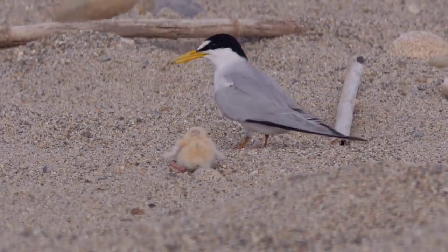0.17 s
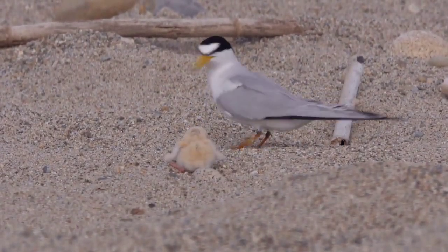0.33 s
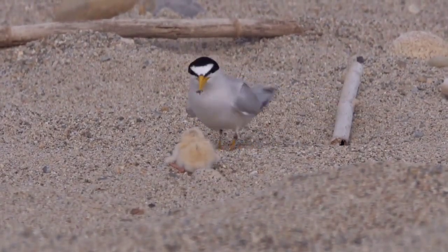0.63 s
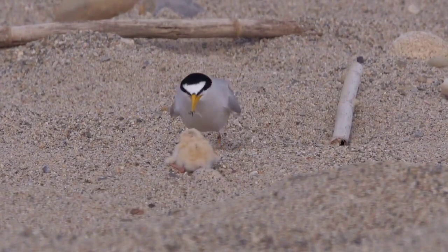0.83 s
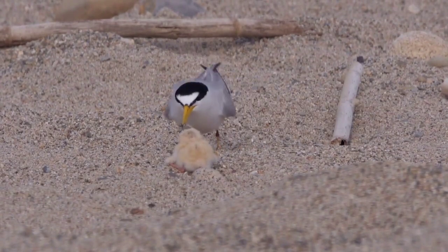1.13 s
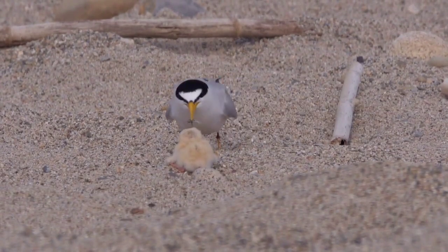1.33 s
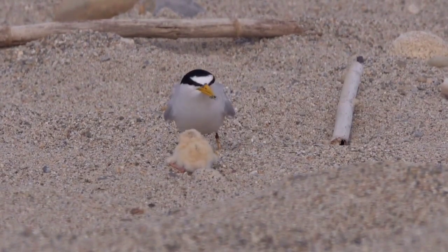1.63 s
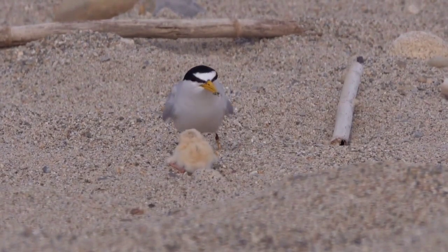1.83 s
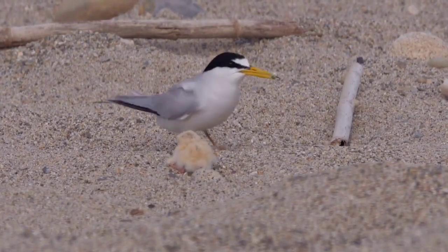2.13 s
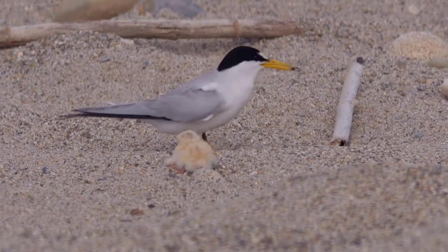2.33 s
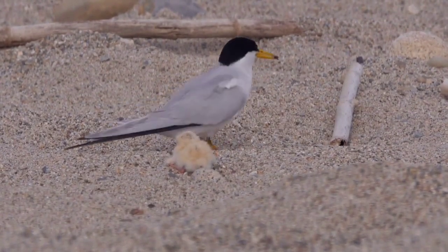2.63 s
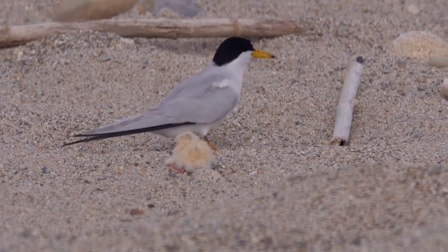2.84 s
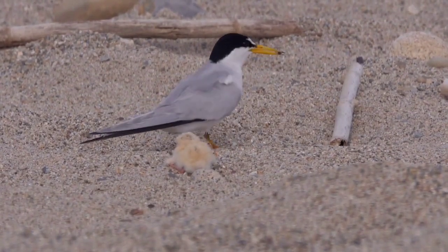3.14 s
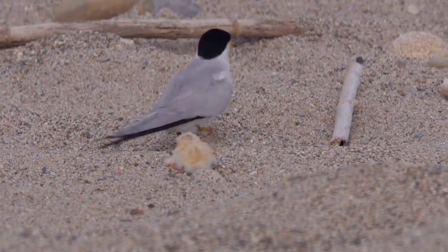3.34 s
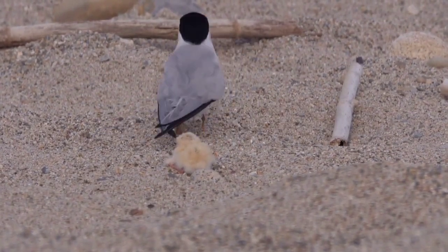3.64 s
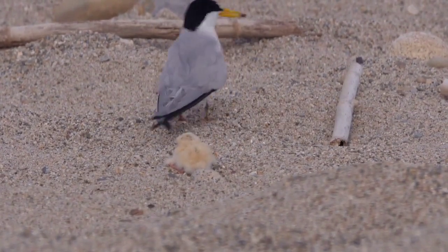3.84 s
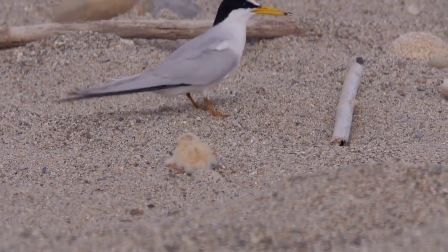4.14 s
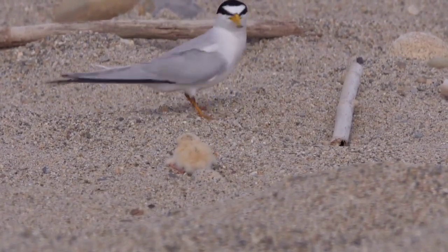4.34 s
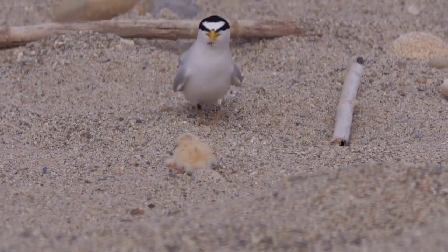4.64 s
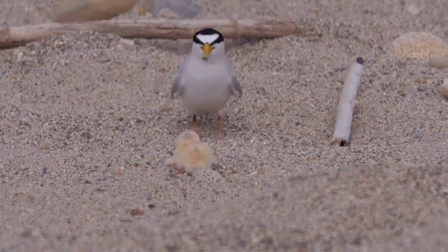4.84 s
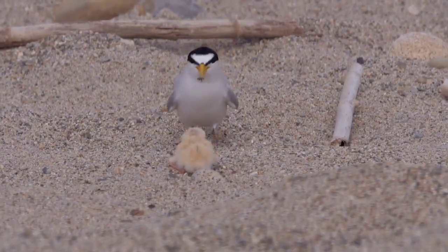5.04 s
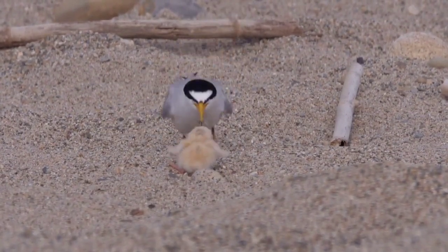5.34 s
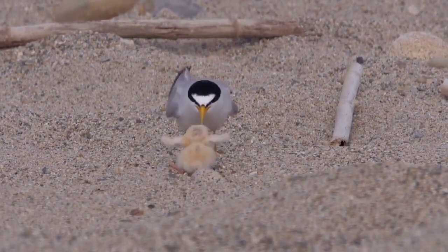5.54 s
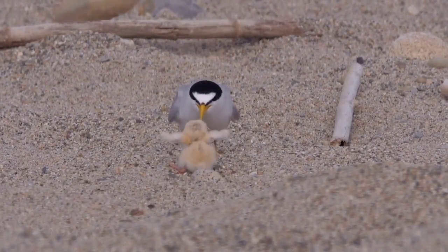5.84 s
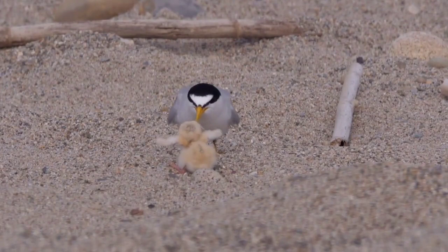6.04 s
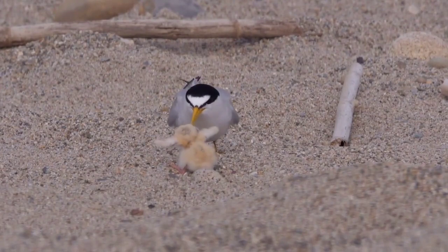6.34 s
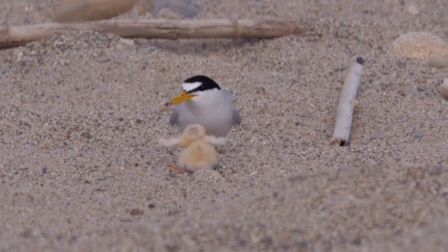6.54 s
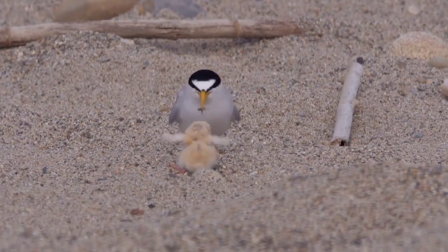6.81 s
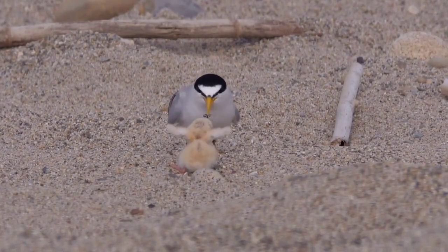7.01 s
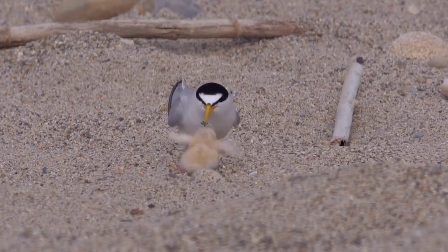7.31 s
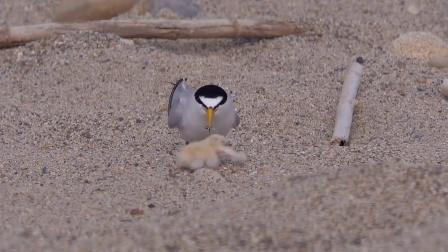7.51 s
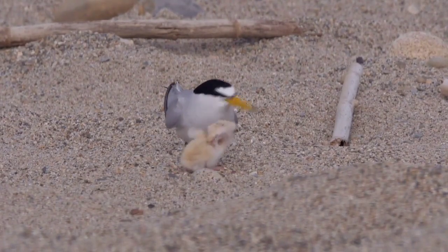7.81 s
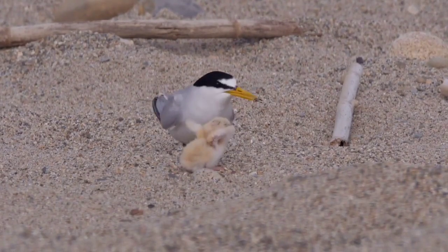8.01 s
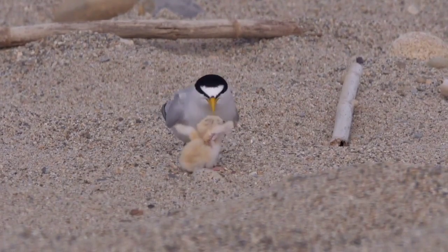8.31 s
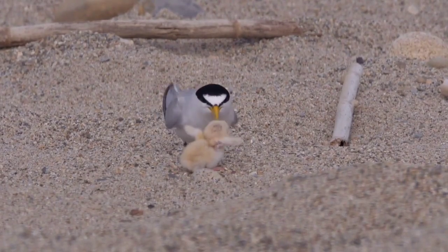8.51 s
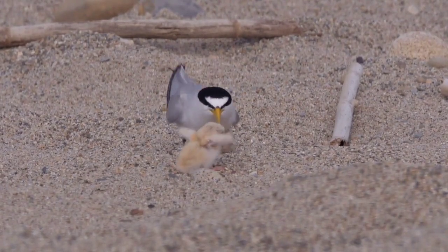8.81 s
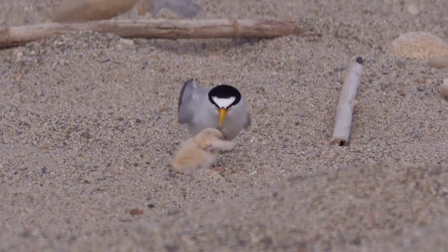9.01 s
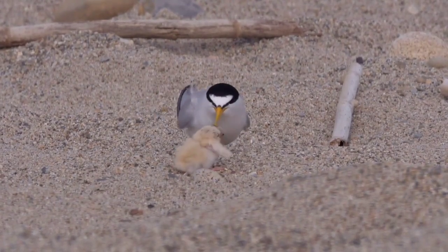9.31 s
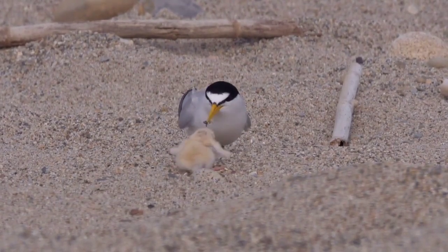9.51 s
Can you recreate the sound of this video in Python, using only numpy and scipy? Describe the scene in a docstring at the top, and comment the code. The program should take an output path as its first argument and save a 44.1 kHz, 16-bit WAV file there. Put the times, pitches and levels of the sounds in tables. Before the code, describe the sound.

Quick high kips and raspy squeaking calls from a small seabird, growing louder and closer, with thin far peeps above even hissing surf.

```python
"""Small terns over a sandy beach

Small terns give short arched kips, rasps that break up into whistles, and thin far peeps.
Each voice is a stack of partials plus rushing air, shaped by a throat; short noise bursts make ticks.
Distant surf is shaped noise that hisses almost evenly; scattered echoes follow the birds and ticks.
A camera with two close microphone ports widens the stereo image, cuts the bass
and turns its gain down after loud calls."""
import sys
import numpy as np
from scipy import signal
from scipy.io import wavfile
from scipy.ndimage import uniform_filter1d

SR = 44100
rng = np.random.default_rng(int(sys.argv[2]) if len(sys.argv) > 2 else 0)


def put_to_file(sound):
    """Save the sound as 16-bit audio at rate SR, in the file named by the first command-line argument."""
    columns = np.atleast_2d(sound).T  # one column per channel
    safe = np.clip(columns, -1, 1)
    whole_steps = np.round(safe * 32767)
    wavfile.write(sys.argv[1], SR, whole_steps.astype(np.int16))


N = 426006
EDGE_HZ = 15750  # top of the camera's band


def amp(db):
    """Turns dB into a gain."""
    return 10 ** (np.asarray(db) / 20)


def evened(x):
    """Scales a signal to rms 1."""
    return x / np.sqrt(np.mean(abs(x) ** 2) + 1e-20)


def read(points, hz):
    """Reads a spectrum table, joining its points by straight lines over log frequency."""
    f, value = np.transpose(points)
    return np.interp(np.log(hz + 1), np.log(f + 1), value)


def add(mix, s, sound):
    """Mixes a stereo sound in at s seconds."""
    part = mix[:, round(s * SR):][:, :sound.shape[1]]
    part += sound[:, :part.shape[1]]


def wander(length, size):
    """Smooth random complex signal of rms 1; a larger size (samples) wanders more slowly."""
    a, b = uniform_filter1d(uniform_filter1d(rng.standard_normal((2, length)), size), size)
    return evened(a + 1j * b)


def surf():
    """Surf and microphone hiss: random short-time spectra with drifting patches and a slow swell."""
    # Relative hiss spectrum: frequency_hz, level_db (per Hz)
    hiss_shape = [(300, -5), (530, -20.5), (700, -30.5), (850, -5.5), (1150, 2.5), (1700, -0.5),
                  (2500, -1.5), (4000, -7), (6000, -13.5), (9300, -15.5), (9900, -18.5), (13000, -17.5),
                  (16000, -18.5)]
    # How alike the two ports' hiss is: frequency_hz, likeness (-1 to 1)
    likeness = [(500, 0.94), (1400, -0.51), (3000, -0.56), (4800, -0.22), (6200, 0.089), (10300, -0.0069),
                (15000, 0.21)]
    # Hiss balance between the ports: frequency_hz, left_over_right_db
    balance = [(60, 3.5), (240, -10), (950, 2), (3770, 2.5), (15000, -1.5)]
    hiss_db = -35  # rms of both ports together
    hop = 128  # samples between spectra
    frames, hz = N // hop + 5, np.fft.rfftfreq(512, 1 / SR)
    a, b, c, d, patches = rng.standard_normal((frames, 257, 5)).T
    patches = uniform_filter1d(patches, size=6, axis=0)
    patches = evened(uniform_filter1d(patches, size=24, axis=1))

    t = np.arange(frames) * hop / SR
    swell = 0
    for f in np.geomspace(.2, 4, num=20):
        swell = swell + np.sin(2 * np.pi * (f * t + rng.random())) / np.sqrt(f)
    swell_db = 0.69 * evened(swell) / (1 + hz[:, None] / 5000)  # fades toward the treble

    same = np.clip(read(likeness, hz), -1, 1)[:, None]
    left, other = a + 1j * b, c + 1j * d
    spectra = np.array([left, same * left + np.sqrt(1 - same ** 2) * other])
    spectra *= amp(read(hiss_shape, hz)[:, None] + 1.6 * patches + swell_db)
    spectra *= amp(np.multiply.outer([.5, -.5], read(balance, hz)))[:, :, None]
    noise = signal.istft(spectra, nperseg=512, noverlap=512 - hop)[1][:, :N]
    return amp(hiss_db) * evened(noise)


def sand(x):
    """Scattered echoes from ground and driftwood, falling 60 dB in 50 ms."""
    t = np.arange(3000) / SR
    scattered = rng.standard_normal((2, 3000)) * (rng.random((2, 3000)) < .1)
    taps = scattered * amp(-60 * t / .05) * (t > .001)
    return signal.oaconvolve(x, taps / np.linalg.norm(taps[0]), axes=1)[:, :N]


def tick(s, db, pan_db):
    """A brief burst of noise that dies away, with its treble softened."""
    burst = rng.standard_normal(300) * np.exp(-np.arange(300) / (.0015 * SR))
    return s, amp(db) * amp([[pan_db / 2], [-pan_db / 2]]) * uniform_filter1d(burst, size=4)


def ports(hz, pan_db, phase):
    """Left and right port gains: mid plus and minus a boosted side, whose delay part grows with pitch."""
    ratio = amp(-pan_db) * np.exp(-1j * np.clip(phase, -3.05, 3.05))  # right over left at 4 kHz
    side = (1 - ratio) / (1 + ratio)
    here = side.real + 1j * side.imag * hz / 4000
    return np.array([1 + here, 1 - here]) / np.sqrt(1 + abs(side) ** 2)


def syrinx(hz, db, shape, throat, place, odd_db=0, rough=.15, air_db=-30):
    """A bird's voice: partials through the throat, smeared by turbulence, plus a broad rush of air."""
    # Far birds: ground bounce thins low partials, air dulls the treble: frequency_hz, gain_db
    far_tone = [(1500, -6), (3000, -5), (4200, -1), (6000, 2), (7500, -12), (12000, -20)]
    hz = hz * (1 + 0.011 * wander(len(hz), size=60).real)
    far = np.clip((-14 - np.max(db)) / 12, 0, 1)  # fainter birds are farther away
    turns, tone, power = np.cumsum(hz) / SR, 0, 0
    for k in range(1, 13):
        partial_hz = k * hz
        gain_db = read(throat, partial_hz) + far * read(far_tone, partial_hz) + odd_db * (k % 2)
        gain = amp(gain_db) * (partial_hz < EDGE_HZ)
        smear = 1 + rough * (1 + .5 * far) * np.sqrt(k) * wander(len(hz), size=16)
        wave = np.exp(1j * (2 * np.pi * k * turns + 2.0 * rng.standard_normal()))
        tone = tone - ports(partial_hz, *place) * gain * smear * wave
        power = power + gain ** 2 / 2
    air_band = signal.butter(1, [1300, 7000], "band", fs=SR)
    rush = signal.lfilter(*air_band, wander(len(hz), size=1))
    air = amp(air_db) * ports(4000, *place)[:, None] * rush
    return (tone / np.sqrt(power.mean()) + air).real * amp(db) * shape


def whistle(s, length, from_hz, to_hz, from_db, to_db, pan_db, phase, droops=True):
    """A nearly clean, slightly arched glide that can droop as it stops; low notes are husky."""
    # Throat and beak for whistles: frequency_hz, gain_db
    whistle_throat = [(1000, 0), (1700, -6.5), (2900, 1.5), (3800, 9), (5800, -7.5), (7500, -16),
                      (9000, -28), (15000, -68)]
    u = np.linspace(0, 1, round(length * SR))
    arch = 0.0188 * np.sin(np.pi * u)
    droop = droops * 0.13 * np.exp((u - 1) * length / 0.0031)
    hz = (from_hz + (to_hz - from_hz) * u) * (1 + arch - droop)
    edge = np.clip(np.minimum(u, 1 - u) * length / .002, 0, 1)  # 2 ms fades
    shape = edge * amp(1.2 * wander(len(u), size=200).real)
    husky = to_hz < 2000
    level_db = from_db + (to_db - from_db) * u
    return s, syrinx(hz, level_db, shape, whistle_throat, (pan_db, phase),
                     rough=0.13 + 0.19 * husky, air_db=-28 + 11.8 * husky)


def peep(s, length, from_hz, to_hz, db, pan_db):
    """One faint whistle from a distant bird, losing 2 dB along the way."""
    return whistle(s, length, from_hz, to_hz, db, db - 2, pan_db, phase=-2.86)


def rasp(s, length, from_hz, to_hz, from_db, to_db, pan_db, phase, rate):
    """A slow flutter chops the tone into pulses, which widen and merge into a pitch wobble with effort."""
    # Throat and beak for rasps: frequency_hz, gain_db
    rasp_throat = [(1000, 26), (1700, -5.5), (2900, 7), (3800, 3), (5300, -11.5), (7500, -18.5),
                   (9000, -34), (15000, -104)]
    bend = 1.8  # power of time by which the pitch climbs
    u = np.linspace(0, 1, round(length * SR))
    flutter_hz = rate * (1 + .025 * wander(len(u), size=300).real)
    cycle = 2 * np.pi * np.cumsum(flutter_hz) / SR
    opening = -np.cos(cycle) - .6 + 2.1 * u ** 1.3  # the valve is open while positive
    uneven = amp(2. * wander(len(u), size=150).real)
    edge = np.clip(np.minimum(u, 1 - u) * length / .002, 0, 1)  # 2 ms fades
    pulses = uneven * (.06 + 1 / (1 + np.exp(-opening / .2))) * edge
    wobble = (.035 + .07 * u ** 2) * np.sin(cycle + .3)
    hz = (from_hz + (to_hz - from_hz) * u ** bend) * (1 + wobble)
    level_db = from_db + (to_db - from_db) * u
    return s, syrinx(hz, level_db, pulses, rasp_throat, (pan_db, phase), rough=.19, air_db=-15)


def long_call(s, pan_db, phase, rasp_s, rasp_hz, rasp_db, low_s, low_hz, low_db, high_s, high_hz, high_db):
    """The rasp jumps up to one or two clear notes and ends in a short husky drop."""
    overlap_s = .003  # the rasp and notes ring on into the next part
    goes_on = high_s > .005  # a high note follows, so the low note climbs more
    low_to_hz = low_hz + (306 if goes_on else 92)
    drop_db = low_db - 5.5
    place = (pan_db, phase)
    parts = [rasp(0, rasp_s + overlap_s, rasp_hz, 2147, rasp_db, low_db - 4.5, *place, rate=166),
             whistle(rasp_s, low_s + overlap_s, low_hz, low_to_hz, low_db, low_db - 5, *place,
                     droops=not goes_on),
             whistle(rasp_s + low_s + high_s, 0.012, 2220, 1340, drop_db, drop_db - 5, *place)]
    if goes_on:
        parts.append(whistle(rasp_s + low_s, high_s + overlap_s, high_hz, high_hz + 131,
                             high_db, high_db - 8, *place))
    call = np.zeros((2, SR // 2))
    for part in parts:
        add(call, *part)
    return s, call


def kip(s, db, pan_db, phase, top_hz, length, odd_db):
    """A steep rising lead-in breaks to a lower pitch that arches over; odd partials change at the top."""
    # Throat and beak for kips: frequency_hz, gain_db
    kip_throat = [(1000, -14), (1300, -14.5), (1650, 0.5), (2600, -1.5), (3900, 2), (5300, 1), (6500, -9),
                  (7800, -12.5), (9500, -61), (15000, -29)]
    lead_s, place = .018, (pan_db, phase)
    high = top_hz > 1400  # high kips climb far after the break
    break_hz = top_hz * (.78 if high else 0.96)
    rise_s = length * (0.368 if high else 0.272)
    fall_s = length - rise_s

    lead_db = -1 + .2 * db  # over the arch; the lead-in stands out more in louder kips
    t = np.arange(-lead_s, 0, 1 / SR)
    lead_hz = break_hz * np.maximum(1.5 + 76 * t, .5)
    lead_level_db = db + lead_db - 62 * (t / lead_s) ** 2
    lead_edge = np.clip(-t / 0.00042, 0, 1) * np.clip((t + lead_s) / 0.0041, 0, 1)
    lead_in = syrinx(lead_hz, lead_level_db, lead_edge, kip_throat, place, rough=.3, air_db=-8)

    t = np.arange(0, rise_s + fall_s + 0.009, 1 / SR)
    up, down = np.clip(t / rise_s, 0, 1), np.clip((t - rise_s) / fall_s, 0, 2)
    pointed = odd_db < -8  # these climb late and drop at once
    climb = up ** 1.5 if pointed else np.sin(np.pi / 2 * up)
    drop = np.minimum(down, 1.2) ** (1.2 if pointed else 2.4)
    hz = (break_hz + (top_hz - break_hz) * climb) * (1 - (.44 if pointed else .36) * drop)
    level_db = db + (.3 * lead_db - 2) * (1 - up) ** 1.5 - 24 * down ** 2
    odd_now_db = odd_db * up ** 3 * np.clip(1 - down ** 2, 0, 1)
    arch = syrinx(hz, level_db, np.clip(t / .0004, 0, 1), kip_throat, place, odd_now_db,
                  rough=.13, air_db=-11)
    return s - lead_s, np.hstack([lead_in, arch])


def scene():
    """All birds and ticks with their echoes over the hiss."""
    # In these tables, levels come before the camera's gain control.
    # Short ticks nearby: start_s, level_db, left_over_right_db
    tick_rows = [(2.605, -17, 3), (5.353, -26, -2), (7.345, -21, 2)]
    # Thin far peeps: start_s, length_s, from_hz, to_hz, start_level_db, left_over_right_db
    peep_rows = [(.138, 0.052, 5700, 5350, -33, -4), (0.363, 0.035, 3890, 3650, -26.5, -2),
                 (0.426, 0.094, 3740, 3610, -25.5, -1), (.665, 0.089, 4170, 3920, -32.5, 3.5),
                 (0.697, 0.052, 5970, 5570, -33.5, -5), (1.027, 0.13, 4110, 3840, -42.5, 13),
                 (1.157, .018, 4050, 4400, -36, 6), (1.419, 0.051, 4080, 3700, -41, 13),
                 (2.535, .016, 3580, 3600, -35, 1.5), (5.206, 0.035, 3830, 3250, -36.5, 17),
                 (6.083, .028, 3980, 3900, -41.5, 7), (6.615, 0.029, 3920, 3830, -27.5, 16),
                 (6.618, 0.039, 4700, 4550, -36, 11), (6.723, 0.069, 4200, 4130, -50, 21),
                 (7.08, .041, 3110, 3184, -42, 4), (8.818, .05, 5300, 5300, -46, 6),
                 (6.977, 0.0204, 3500, 3450, -84, 14), (7.28, 0.017, 3880, 3720, -40, 10),
                 (7.323, 0.073, 3790, 4100, -36, 12), (8.062, 0.043, 4070, 4240, -35.5, 14),
                 (8.3, 0.065, 3970, 4150, -42, 12), (8.325, .027, 3590, 3600, -36, 12),
                 (9.187, 0.034, 3840, 3960, -40, 17), (9.253, .05, 4600, 4700, -50, 0),
                 (9.35, .032, 4400, 4500, -45, -1), (9.463, .06, 4890, 5150, -40, 4)]
    # Long calls: start_s, left_over_right_db, phase_rad, then for the rasp, low note and high note
    # in turn: length_s, start_pitch_hz, start_level_db (a high note under 5 ms is left out)
    long_call_rows = [(0.112, -1, -2.5, 0.13, 1624, -19.5, 0.023, 2750, -18, 0.023, 3715, -13.5),
                      (0.821, 0.5, -2.5, .118, 1620, -27, 0.038, 2776, -25, 0, 0, 0),
                      (1.239, 3, 5, 0.12, 1580, -40, 0.023, 2890, -24, 0.026, 3876, -16.5),
                      (1.9, -2.5, -2.5, .1, 1670, -63, 0.015, 3050, -23.5, 0.036, 3680, -26.5),
                      (4.594, -4.5, -2.5, .1, 1455, -22.5, 0.0183, 2760, -12.5, .032, 3716, -4.5),
                      (5.368, -3, 0.79, 0.1, 1627, -15, 0.036, 2748, -3.5, 0.00076, 0, 0),
                      (7.502, 0.5, 0.23, 0.11, 1663, -14, 0.023, 2760, -7, 0.015, 3652, 0.5),
                      (9.006, 3, 0.46, 0.11, 1670, -15, .038, 2867, -8, 0.000047, 0, 0)]
    # Kips: pitch_break_s, level_db, left_over_right_db, phase_rad, top_hz, arch_length_s,
    # odd_partials_at_top_db
    kip_rows = [(0.057, -29, -6, -2.5, 1460, 0.06, 0), (0.628, -25, -2.5, -2.5, 1520, 0.051, -8),
                (0.859, -29.5, -4, -2.5, 1141, 0.037, -9), (1.007, -32, -3, -2.5, 1160, .017, 1),
                (2.352, -31.5, -5, -3, 1243, 0.037, 7.5), (2.46, -31.5, 1, 2, 1220, 0.028, -3.5),
                (2.666, -16.5, -2.5, -2.5, 1590, 0.018, -38), (2.875, -15.5, -2.5, -2.5, 1524, .034, -37),
                (3.204, -18, -4.5, -3, 1517, 0.029, -19.5), (3.307, -42, 10, 1.5, 1280, .02, 4.5),
                (3.468, -20.5, -3, -2.5, 1176, 0.021, -1), (3.8365, -9.5, -2, -2.5, 1238, .026, -11),
                (4.233, -12.5, -5.5, -2.5, 1257, 0.03, -5), (6.38, -8.5, -8, -2, 1446, 0.033, -9.5),
                (7.795, -8.5, -5.5, 1.43, 1660, 0.035, -5), (7.949, 1, -8, 1.02, 1248, 0.03, -1),
                (8.2193, 4, 0.5, 1.23, 1314, 0.026, -2), (8.4674, 2, 1, 1.49, 1340, .03, -6),
                (8.7422, 1, 1.5, 1.55, 1310, 0.03, -1.5), (9.031, -8.5, 1, 0.15, 1275, 0.027, -5),
                (9.395, -8.5, 2, 0.5, 1231, 0.033, -3.5)]
    birds = np.zeros((2, N))
    voices = ((tick, tick_rows), (peep, peep_rows), (long_call, long_call_rows), (kip, kip_rows))
    for voice, rows in voices:
        for row in rows:
            add(birds, *voice(*row))
    return birds + amp(-13) * sand(birds) + surf()


def record(dry):
    """The camera: bass cut, gain control with quick fall and exponential recovery, clipping, band limit."""
    bass_cut = signal.butter(10, 680, "high", fs=SR, output="sos")
    cut = signal.sosfilt(bass_cut, dry)
    threshold_db, recovery_s, strength = -11.0, 0.21, 0.65
    louder_port = (cut ** 2).max(0)
    power_db = 10 * np.log10(abs(uniform_filter1d(louder_port, size=300)) + 1e-12)
    over_db = np.maximum(power_db - threshold_db, 1e-3)
    recovery = np.arange(N) / SR / recovery_s
    # Hold each excess and let it shrink exponentially until a larger one comes
    held_db = np.exp(np.maximum.accumulate(np.log(over_db) + recovery) - recovery)
    gain_drop_db = strength * uniform_filter1d(held_db, size=300, origin=-100)
    ducked = np.clip(cut / amp(gain_drop_db), -1, 1)
    band_limit = signal.firwin(511, EDGE_HZ, window=("kaiser", 9), fs=SR)
    return signal.oaconvolve(ducked, band_limit[None], "same")


dry = scene()
out = record(dry)
put_to_file(out)
```